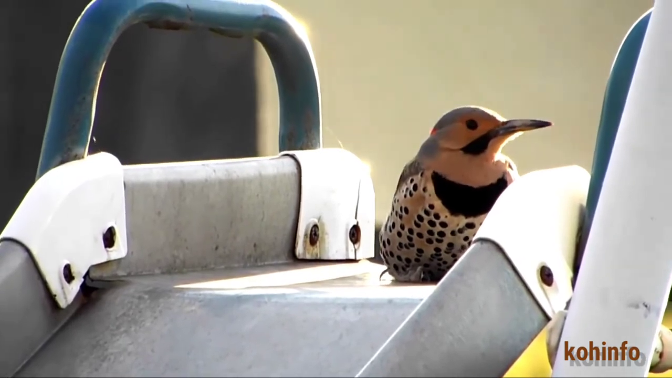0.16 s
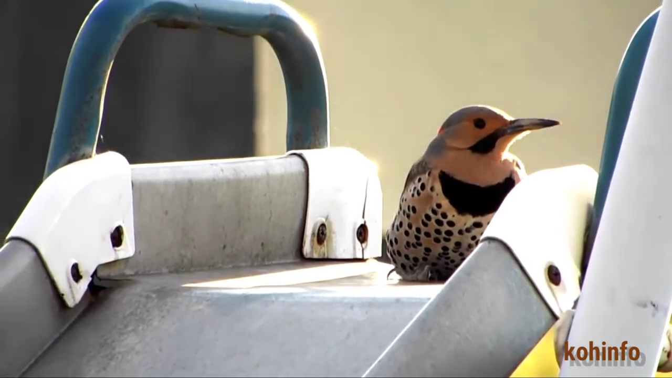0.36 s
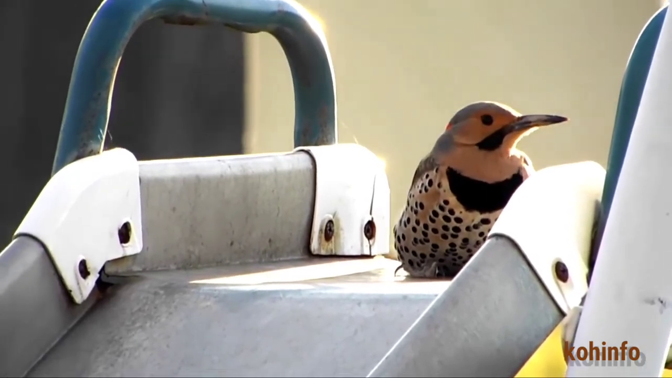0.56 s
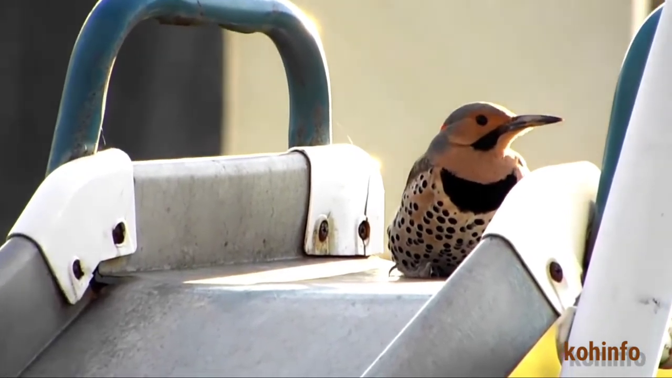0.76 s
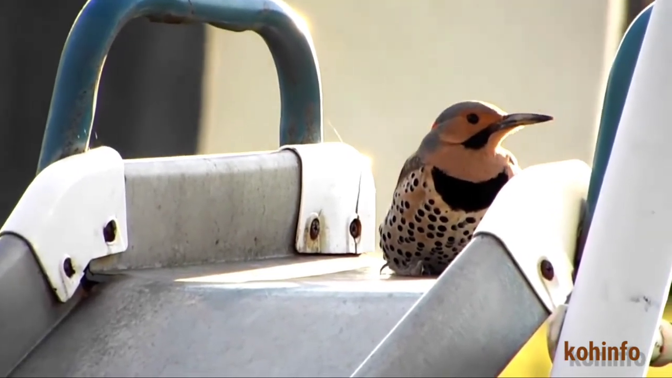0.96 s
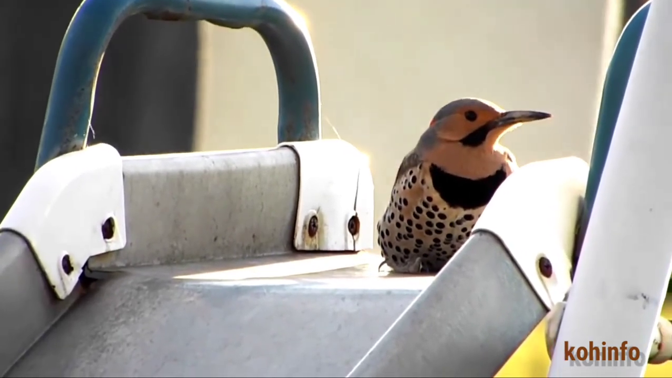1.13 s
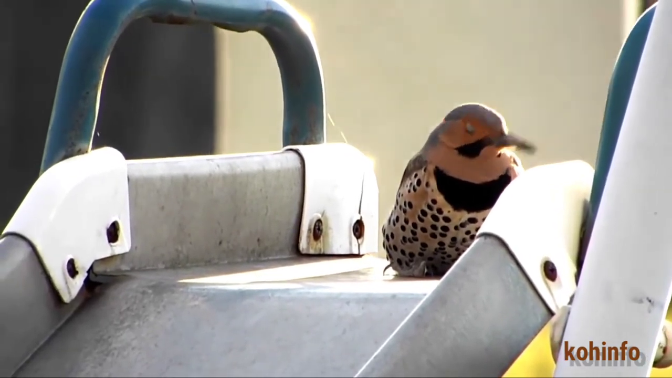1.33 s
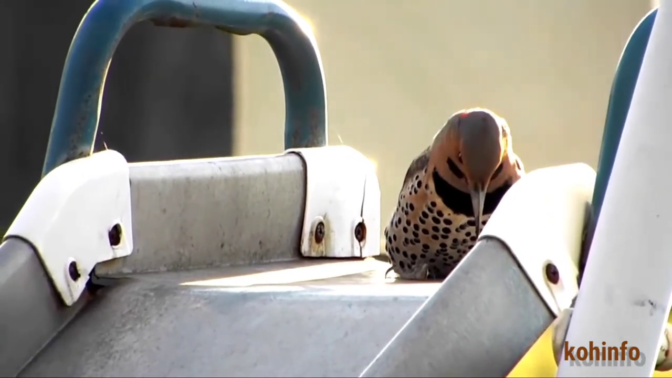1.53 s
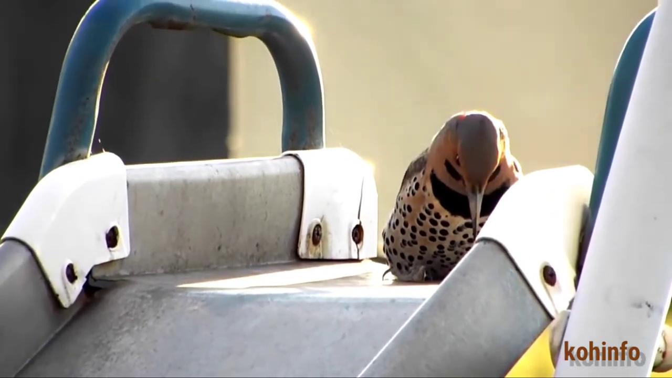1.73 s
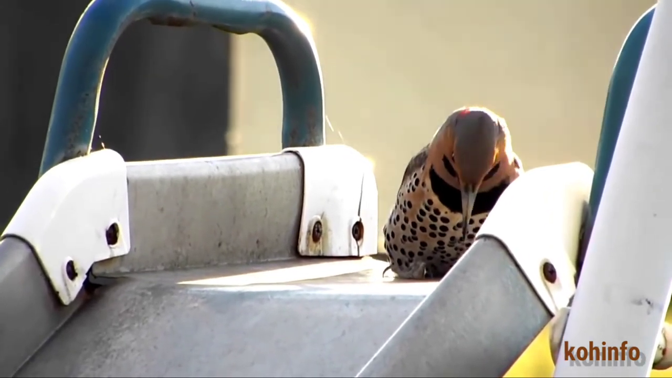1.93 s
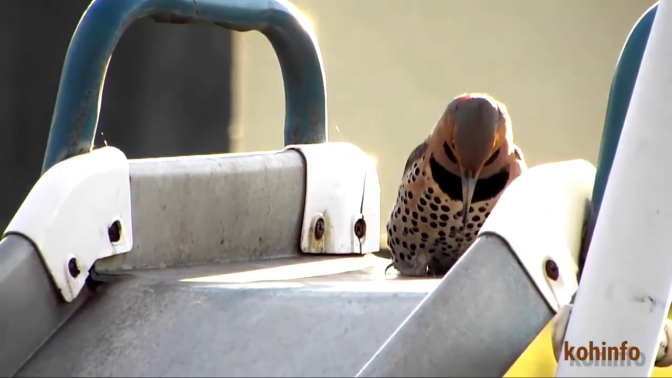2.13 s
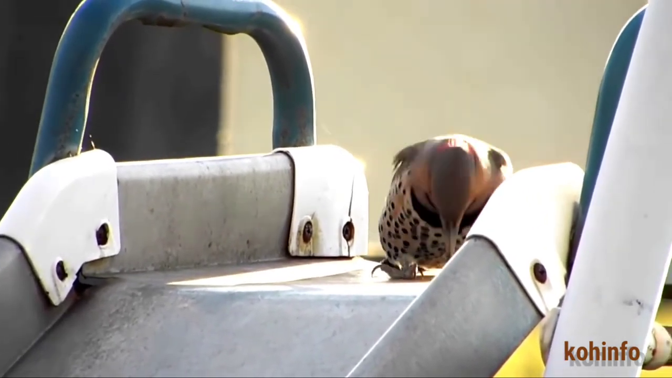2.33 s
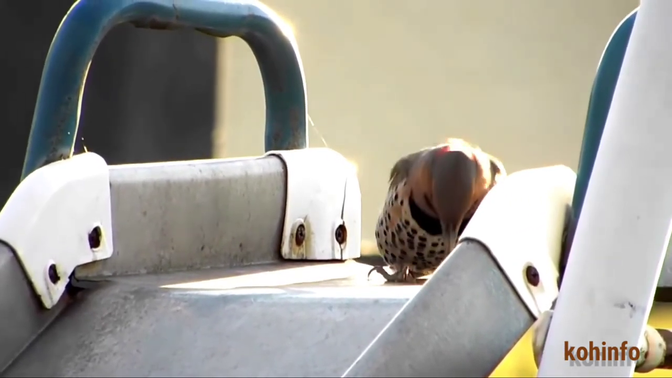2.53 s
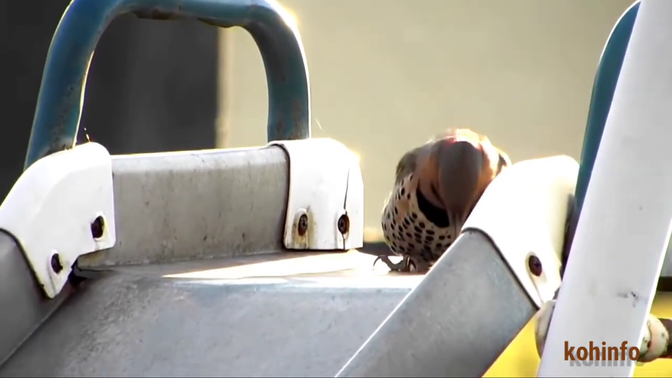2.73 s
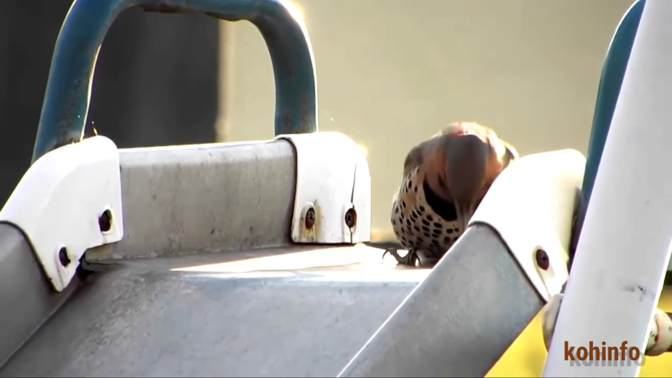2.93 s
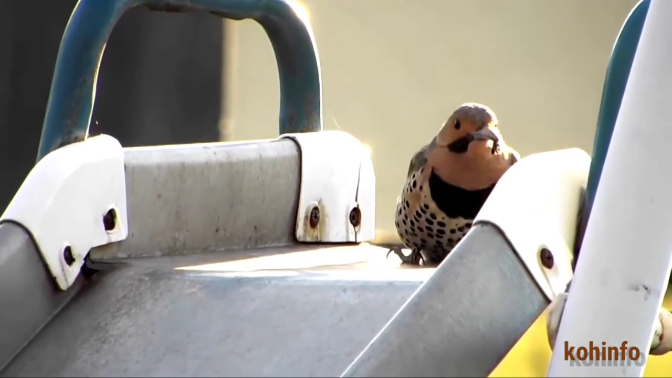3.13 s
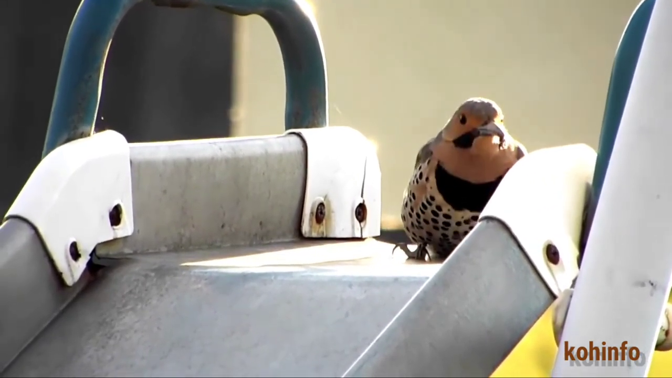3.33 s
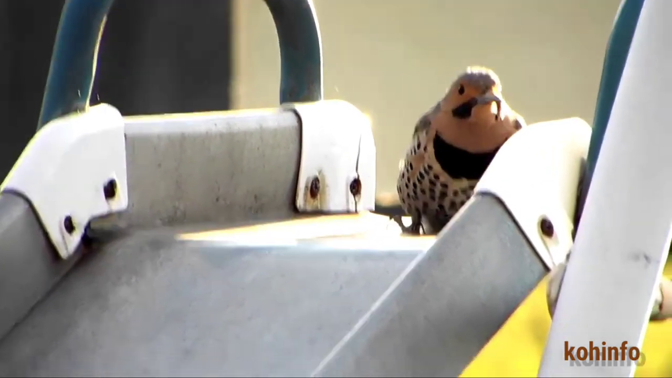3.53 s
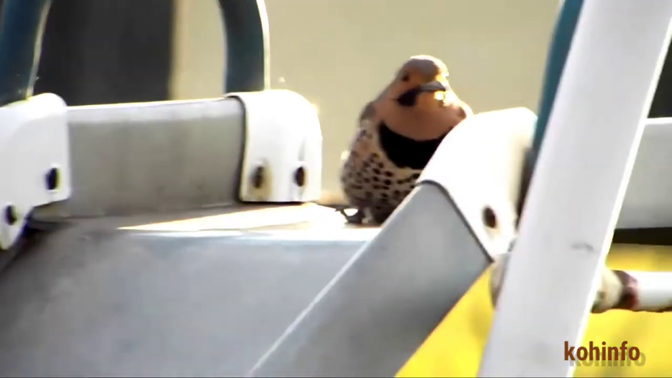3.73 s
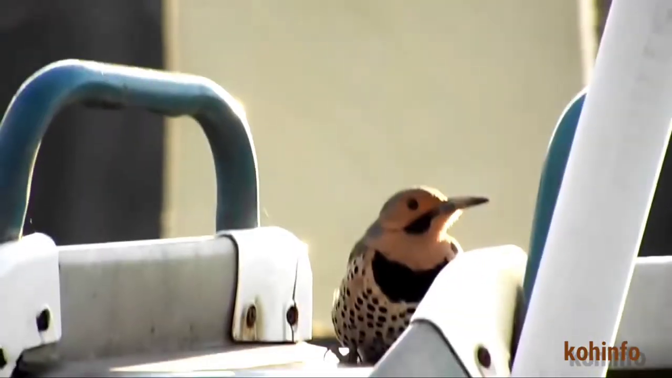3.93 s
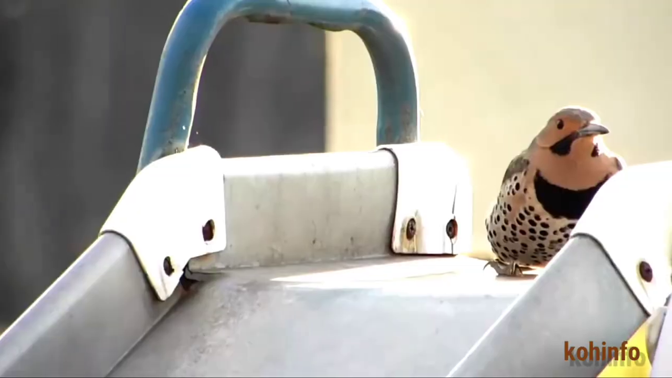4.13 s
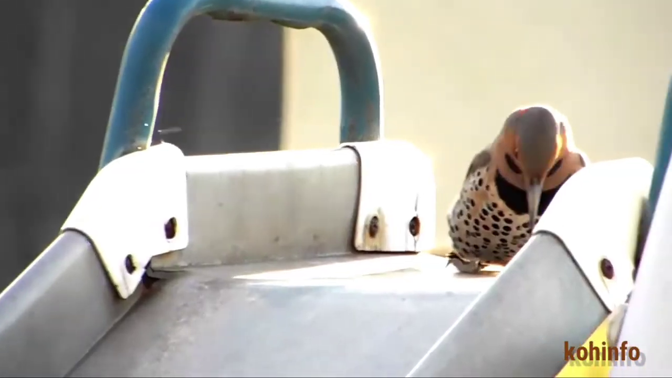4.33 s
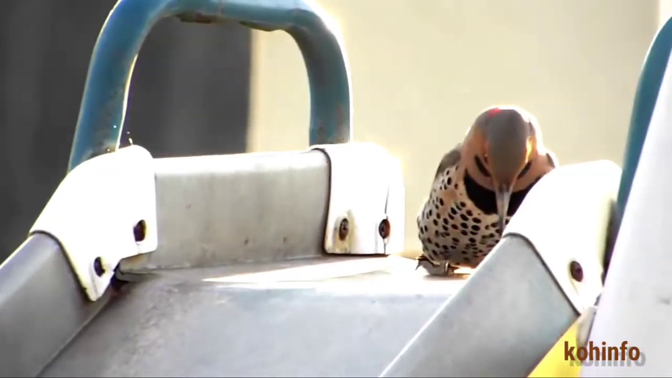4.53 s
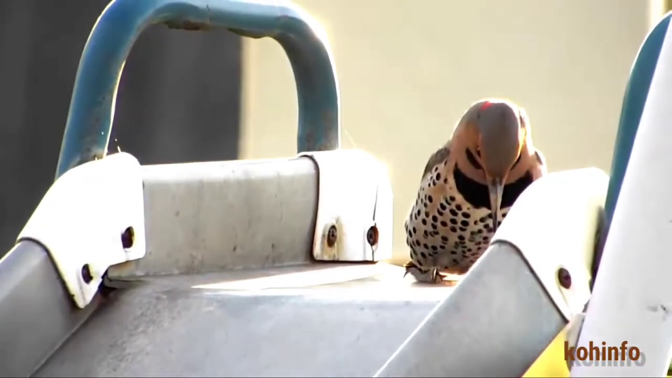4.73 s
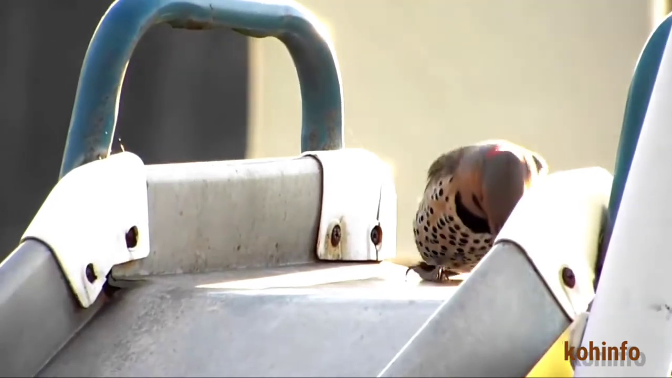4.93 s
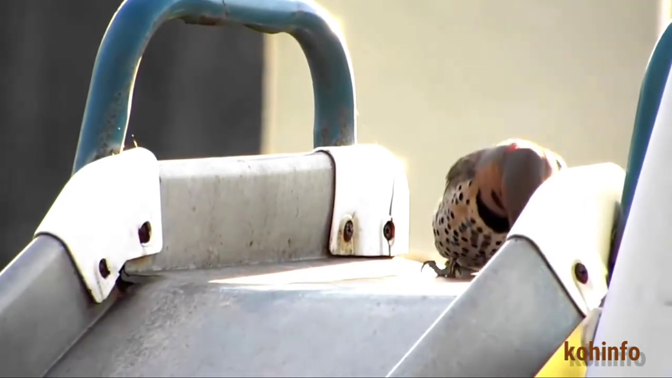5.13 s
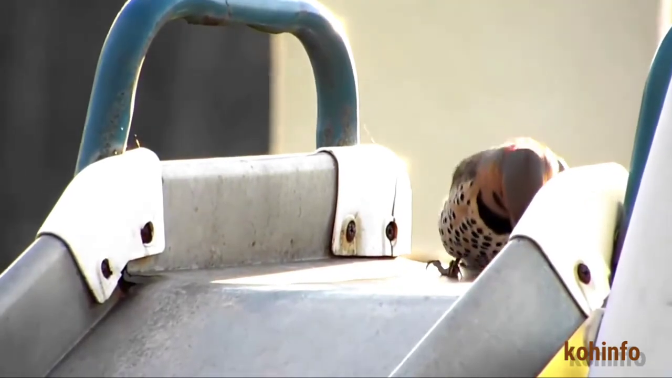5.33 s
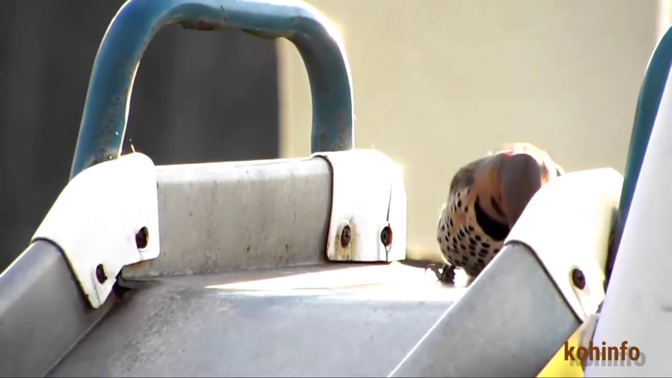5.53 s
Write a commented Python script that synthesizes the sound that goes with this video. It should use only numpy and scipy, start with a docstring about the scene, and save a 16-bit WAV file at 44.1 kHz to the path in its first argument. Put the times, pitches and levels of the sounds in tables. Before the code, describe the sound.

Outdoors, a small bird's fast trill swells over wind rumble and a distant roar. A woodpecker then drums a rapid clanging roll on a metal slide. Two sharp snaps click close to the microphone, the sound briefly dips, and a second metallic roll follows, ending with slurred bird calls.

```python
"""Wind rumbles on the microphone under a distant roar and drone, with a hollow swell near the start.
A bird trills in crescendo, soft rustles pass, and small birds whistle and buzz throughout.
A woodpecker drums a fast roll on the metal top of a playground slide: each blow excites decaying modes.
Two sharp snaps sound close by; soon the whole level dips briefly and the roar comes back softer.
The second roll follows, then a cluster of slurred calls, while the roar grows again."""
import sys
import numpy as np
from scipy import signal
from scipy.fft import rfft, irfft
from scipy.io import wavfile

SR = 44100
rng = np.random.default_rng(int(sys.argv[2]) if len(sys.argv) > 2 else 0)


def put_to_file(sound):
    """Save the sound as 16-bit audio at rate SR, in the file named by the first command-line argument."""
    columns = np.atleast_2d(sound).T  # one column per channel
    safe = np.clip(columns, -1, 1)
    whole_steps = np.round(safe * 32767)
    wavfile.write(sys.argv[1], SR, whole_steps.astype(np.int16))


N = 250033
TIME = np.arange(N) / SR


def amp(db):
    """Logarithmic level: decibels become an amplitude ratio."""
    return 10 ** (np.asarray(db) / 20)


def unit(x):
    """Normalization: the signal is scaled to a root-mean-square value of 1."""
    return x / np.sqrt(np.mean(x ** 2) + 1e-20)


def at_hz(points, hz):
    """Interpolation on a logarithmic frequency axis."""
    table_hz, value = np.transpose(points)
    return np.interp(np.log(hz + 1), np.log(table_hz + 1), value)


def level(rows):
    """Envelope: gain over the whole scene, linear in decibels between the rows."""
    return amp(np.interp(TIME, *np.transpose(rows)))


def add(mix, start_s, sound):
    """Superposition: a sound is summed into the mix in place, cut off at the end."""
    part = mix[..., max(round(start_s * SR), 0):][..., :sound.shape[-1]]
    part += sound[..., :part.shape[-1]]


def noise(spectrum, likeness, size):
    """Coherence: shared and opposed random parts set how alike left and right are at each frequency."""
    hz = np.fft.rfftfreq(size, 1 / SR)
    same = np.clip(at_hz(likeness, hz), 0, 1)
    white = rfft(rng.standard_normal((2, size)))
    mid, side = white * np.sqrt([1 + same, 1 - same])
    colored = np.array([mid + side, mid - side]) * amp(at_hz(spectrum, hz))
    return unit(irfft(colored, size))


def die_away(x, t60s):
    """Frequency-dependent damping: each band decays exponentially at its own speed."""
    hz, t, bands = signal.stft(x, SR, nperseg=256)
    decay = amp(-60 * t / at_hz(t60s, hz)[:, None])
    return signal.istft(bands * decay, SR, nperseg=256)[1][:, :x.shape[-1]]


def drift(size, rate_hz):
    """Low-pass random process: a smooth wander of rms 1."""
    hz = np.fft.rfftfreq(size, 1 / SR)
    return unit(irfft(rfft(rng.standard_normal(size)) * np.exp(-(hz / rate_hz) ** 2), size))


# strongest modes of the slide: frequency_hz, level_db, t60_s
MODES = [(302, -9, 0.41), (346.4, -1.5, 0.89), (374.8, -7, 0.85), (470.7, -9, 0.57), (736, -13, 0.66),
         (881, -4, 0.42), (1092, -1, 0.66), (1227, -14, 0.45), (1290, -2, 0.26), (1342, 6, 0.14),
         (1690, -16, .3), (1809, 3.5, 0.37), (1936, 0, 0.23), (1893, -15, 0.26), (2045, -3.5, 0.31),
         (3020, -4, 0.42), (3860, -40, .2), (4200, -11, 0.33), (5000, -6, 0.31), (5460, -5.5, 0.3)]
# dense weaker modes of the sheet: frequency_hz, density_db_per_hz
CLANG = [(60, -23), (200, -10), (380, -4), (560, -5), (900, -0.5), (1400, 2), (1950, -5.5), (2300, -1.5),
         (4000, -6), (5800, -3.5), (7200, -16), (9000, -20), (15000, -20)]
# decay of the dense modes: frequency_hz, t60_s
CLANG_T60 = [(300, 1), (1500, 0.48), (5000, 0.38), (9000, 0.34), (15000, 0.13)]
# hollow knock near the bill: frequency_hz, density_db_per_hz
KNOCK = [(400, -20), (800, -9), (1100, 5.5), (1400, -11.5), (1850, 6.5), (2200, -21), (4000, -17),
         (8000, -36)]
# left-right likeness of the metal sound: frequency_hz, likeness (0-1)
METAL_LIKENESS = [(200, 1), (1500, 0.99), (2500, 1), (4400, .91), (8000, 0.66), (15000, .35)]


def drumming(modes_db=-24.0, clang_db=-20, crack_db=-18, crack_t60=0.016, knock_db=-17, knock_t60=0.1,
             alike=0.51, mode_spread=0.0049, build_s=0.0044):
    """Modal excitation: each blow cracks and knocks, then rings strong modes and a dense metal clang."""
    t = np.arange(SR) / SR
    out = np.zeros((2, N))
    alike = np.clip(alike, 0, 1)
    sheet = noise(CLANG, METAL_LIKENESS, size=SR)
    mode_hz = np.transpose(MODES)[0][:, None]
    fades = np.array([amp(db - 60 * t / t60) for _, db, t60 in MODES])
    spreading = 1 - np.exp(-t / build_s)  # the ring needs a moment to cross the sheet
    for start_s, force_db in blows():
        # the bill lands on a slightly different spot each time: only part of the clang repeats
        fresh = noise(CLANG, METAL_LIKENESS, size=SR)
        dense = np.sqrt(alike) * sheet + np.sqrt(1 - alike) * fresh
        # each strong mode, a cluster of close ones, answers at a slightly different pitch
        detune, phase = rng.standard_normal((2, len(MODES), 1))
        blow_hz = mode_hz * (1 + mode_spread * detune)
        ring = (fades * np.sin(2 * np.pi * (blow_hz * t + phase))).sum(0)
        crack = amp(crack_db - 60 * t / crack_t60) * dense
        knock = amp(knock_db - 60 * t / knock_t60) * noise(KNOCK, METAL_LIKENESS, size=SR)
        clang = amp(clang_db) * die_away(dense, CLANG_T60)
        ringing = spreading * (clang + amp(modes_db) * ring)
        add(out, start_s, amp(force_db) * (crack + knock + ringing))
    return out


# drum rolls: start_s, force_db, lag_s (time lost while the first blows get up to speed)
ROLLS = [(2.3312, -0.95, .0052), (4.9324, 0.6, .0034)]
# force through every roll, a hard start, a slack, a swell and a fade: since_start_s, force_db
ROLL_FORCE = [(0, 2), (.045, 1), (.12, -2), (.42, 0.25), (.63, -1), (.735, -3.5)]
BLOW_COUNT, BLOW_PERIOD_S = 19, .04051


def blows(settle_blows=1.0):
    """Periodic impacts: an exponential lag lets each roll settle at once into a steady beat."""
    k = np.arange(BLOW_COUNT)
    for start_s, force_db, lag_s in ROLLS:
        since = k * BLOW_PERIOD_S + lag_s * (1 - np.exp(-k / settle_blows))
        forces_db = force_db + np.interp(since, *np.transpose(ROLL_FORCE))
        yield from zip(start_s + since, forces_db)


def whistle(hz, waver=0.0039):
    """Frequency modulation: a nearly pure bird tone on a slightly unsteady pitch."""
    unsteady_hz = hz * (1 + waver * drift(len(hz), 240))
    return np.sqrt(2) * np.sin(2 * np.pi * np.cumsum(unsteady_hz) / SR)


# one trill note, a down-slur and an upward flick: since_start_s, pitch_hz, level_db
SLUR = [(0, 6410, -26), (.004, 5953, 0), (.009, 5490, -1), (.015, 4895, -8.5), (.019, 4375, -6.5),
        (.021, 5800, -1), (.023, 7300, -11.5), (0.025, 8000, -17)]
TRILL_START_S, TRILL_PERIOD_S, TRILL_COUNT = .374, .05686, 27
# full level, extra at the soft start, and time taken to grow
TRILL_DB, TRILL_SOFT_DB, TRILL_GROW_S = -26, -11, 0.92


def trill(pitch_spread=0.017, pace_spread=0.1, rasp=0.0216, uneven_db=1.0, range_spread=0.096):
    """Repetition with variation: one slurred note at an even pace in crescendo, never quite alike."""
    mark_s, mark_hz, mark_db = np.transpose(SLUR)
    out = np.zeros(N)
    for since in np.arange(TRILL_COUNT) * TRILL_PERIOD_S:
        sharp, slow, loud, wide = rng.standard_normal(4)
        softness_db = TRILL_SOFT_DB * max(1 - since / TRILL_GROW_S, 0)
        note_db = TRILL_DB + softness_db + uneven_db * loud
        marks = mark_s * np.exp(pace_spread * slow)
        t = np.arange(0, marks[-1], 1 / SR)
        shape = amp(np.interp(t, marks, mark_db)) * signal.windows.tukey(len(t), .1)
        widened_hz = mark_hz + range_spread * wide * (mark_hz - mark_hz.mean())
        pitch_hz = np.interp(t, marks, widened_hz) * (1 + pitch_spread * sharp)
        add(out, TRILL_START_S + since, amp(note_db) * shape * whistle(pitch_hz, waver=rasp))
    return out


def song(buzz_hz=57, buzz_slide=0.085, taper=0.75, rasp=0.012, uneven_db=2, bend=1.576,
         fade_db=-3, hoarse_db=-7.5, hoarse_spread=0.135):
    """Amplitude and frequency modulation: gliding whistles fade; buzzes break into sliding, hoarse pulses."""
    out = np.zeros(N)
    for start_s, length_s, first_hz, last_hz, level_db, buzz in notes():
        t = np.arange(0, length_s, 1 / SR)
        done = np.clip(t / length_s, 0, 1)
        glide_hz = last_hz + (first_hz - last_hz) * (1 - done) ** bend
        buzz = np.clip(buzz, 0, 1)
        cycle = (buzz_hz * t) % 1
        unevenness = amp(buzz * uneven_db * drift(len(t), 40))
        pulses = (1 - buzz * np.cos(np.pi * cycle) ** 2) ** 2 * unevenness
        pulse_slide = 1 + buzz ** 2 * buzz_slide * (1 - 2 * cycle)
        tone = whistle(glide_hz * pulse_slide, waver=0.0069 + rasp * buzz)
        rough = whistle(glide_hz, waver=hoarse_spread) * drift(len(t), 700)
        hoarse = amp(hoarse_db) * buzz ** 2 * rough
        edges = signal.windows.tukey(len(t), taper * (1 - buzz))
        add(out, start_s, amp(level_db + fade_db * done ** 2) * pulses * edges * (tone + hoarse))
    return out


# a whistle that drops, a high buzz, a low whistle and a low buzz:
# since_start_s, length_s, start_hz, end_hz, level_db, buzz (0-1)
PHRASE = [(0, 0.069, 4030, 4050, -25, 0.04), (0.049, 0.027, 4050, 3160, -28.5, 0.2),
          (0.097, .12, 5470, 5316, -20.5, 0.74), (.298, 0.0445, 2880, 2670, -27, .15),
          (0.363, .16, 3696, 3557, -27.5, 1)]
# each time the phrase is sung: start_s, pitch_ratio, level_db, swell_db_per_s
PHRASES = [(1.605, 0.99, 1.5, -7.5), (4.16, 1.005, -5, 22)]
# a row of even pips, each sagging a little in pitch
PIP_START_S, PIP_PERIOD_S, PIP_COUNT = 3.584, .168, 4
PIP_S, PIP_HZ, PIP_SAG_HZ, PIP_DB, PIP_BUZZ = 0.058, 5800, 131, -29, 0.091
# thin, high contact notes: start_s, length_s, pitch_hz, level_db
THIN_NOTES = [(1.042, .075, 7320, -43), (1.382, .053, 7400, -42), (1.937, 0.067, 6980, -40.5),
              (2.722, .025, 7300, -32.5), (2.868, .13, 7120, -39), (3.261, 0.068, 7020, -39)]
THIN_BUZZ = 0.18
# slurred calls of other birds: start_s, length_s, start_hz, end_hz, level_db, buzz (0-1)
SLURRED_CALLS = [(1.457, .034, 7130, 6550, -25, 0), (1.485, 0.06, 6570, 6260, -16, 0.08),
                 (2.236, 0.027, 4970, 6140, -31.5, 0.3), (2.252, 0.085, 6600, 6530, -25, .1),
                 (2.97, .056, 3900, 3410, -23, 0.53), (3.371, .13, 4900, 4880, -39.5, .3),
                 (4.436, 0.024, 6900, 5830, -33.5, 0.6), (5.365, 0.048, 4350, 3790, -18, 0.73),
                 (5.395, .03, 4010, 5110, -13, 0.84), (5.434, .042, 4000, 3880, -21.5, .15),
                 (5.458, 0.035, 3620, 2930, -18, 0.7)]


def notes():
    """Transposition and sequence: lists every note as start, length, first and last pitch, level, buzz."""
    phrases = [(start_s + since, length_s, ratio * first_hz, ratio * last_hz,
                note_db + phrase_db + swell * since, buzz)
               for start_s, ratio, phrase_db, swell in PHRASES
               for since, length_s, first_hz, last_hz, note_db, buzz in PHRASE]
    pips = [(PIP_START_S + k * PIP_PERIOD_S, PIP_S, PIP_HZ, PIP_HZ - PIP_SAG_HZ, PIP_DB, PIP_BUZZ)
            for k in range(PIP_COUNT)]
    thin = [(start_s, length_s, pitch_hz, pitch_hz, level_db, THIN_BUZZ)
            for start_s, length_s, pitch_hz, level_db in THIN_NOTES]
    return phrases + pips + thin + SLURRED_CALLS


# decay of the scattered tail: frequency_hz, t60_s
YARD_T60 = [(1000, 0.82), (3800, 0.65), (6000, 0.58), (9000, 0.19)]


def yard(x, echoes_db, tail_db, echo_s, count=12):
    """Convolution: direct sound, early echoes from nearby walls, and a scattered tail from the trees."""
    scatter = noise([(1000, 0), (10000, 0)], [(1000, 0.94), (10000, 0.72)], size=SR)
    tail = die_away(scatter, YARD_T60)
    response = amp(tail_db) * tail / np.linalg.norm(tail[0])
    echo_gain = amp(echoes_db) / np.sqrt(count)
    for when, sign, side in rng.random((count, 3)):
        delay = int((.002 + when * echo_s) * SR)
        # up to two samples between the channels place the echo on either side
        for channel, offset in enumerate((0, round(side * 4 - 2))):
            response[channel, delay + offset] += np.sign(sign - .5) * echo_gain
    response[:, 0] += 1
    return signal.fftconvolve(x[None], response, axes=1)[:, :N]


# snaps, the first two almost together: start_s, level_db, ring_hz, t60_s, knock_db
SNAPS = [(3.668, -11.5, 5570, 0.018, -36), (3.673, 2.5, 6120, 0.021, -26), (3.809, -6.5, 5800, 0.02, -3)]
# bright spray: frequency_hz, density_db_per_hz
SNAP_SPRAY = [(1500, -7.5), (3500, -9), (5500, 4), (7900, -2.5), (9300, -13), (15000, -15)]
# left-right likeness of the spray: frequency_hz, likeness (0-1)
SNAP_LIKENESS = [(1000, 0.54), (5000, 0.26), (9000, 0.15)]


def snaps(spray_db=-4, ring_db=-2, knock_hz=1100, lead_rad=1.54, size=4096):
    """Transient decay: hard, dry snaps off to one side, each a bright spray, a short ring and a knock."""
    t = np.arange(size) / SR
    out = np.zeros((2, N))
    for start_s, level_db, ring_hz, t60, knock_db in SNAPS:
        spray = amp(spray_db) * noise(SNAP_SPRAY, SNAP_LIKENESS, size=size)
        tone = signal.hilbert(whistle(np.full(size, ring_hz), waver=0.057))
        turn = np.exp(1j * np.array([[0], [lead_rad]]))  # reaches one side first
        ring = amp(ring_db) * np.real(tone * turn)
        knock = amp(knock_db) * np.sin(2 * np.pi * knock_hz * t)
        add(out, start_s, amp(level_db - 60 * t / t60) * (spray + ring + knock))
    return out


# soft rustles: start_s, length_s, level_db
RUSTLES = [(0.901, 0.17, -28.5), (1.261, 0.12, -29), (4.404, 0.2, -34)]
# rustle color: frequency_hz, density_db_per_hz
RUSTLE = [(800, -30), (2000, -9), (4500, 10), (6500, -6), (14000, -19)]
# left-right likeness, also of the wind, far sounds and hiss: frequency_hz, likeness (0-1)
AIR_LIKENESS = [(30, 0.58), (80, 0.84), (150, 0.97), (300, 0.83), (1300, 0.99), (4000, 0.72), (8000, 0.26),
                (14000, 0.1)]


def rustles(grain_db=2, rise_s=0.018):
    """Modulated noise: grainy puffs start quickly and fade."""
    out = np.zeros((2, N))
    for start_s, length_s, level_db in RUSTLES:
        t = np.arange(0, length_s, 1 / SR)
        unevenness = amp(grain_db * drift(len(t), 200))
        grains = unit(noise(RUSTLE, AIR_LIKENESS, size=len(t)) * unevenness)
        add(out, start_s, amp(level_db) * np.minimum(t / rise_s, 1) * (1 - t / length_s) * grains)
    return out


# wind color: frequency_hz, density_db_per_hz
WIND = [(10, -1.5), (25, 4), (50, -1.5), (100, -6), (170, -21.5), (260, -35), (400, -28), (900, -47)]
# wind strength: start_s, level_db
WIND_DB = [(0, -30), (.8, -29.5), (1.5, -32), (2.3, -31), (2.5, -22.5), (2.7, -27.5), (3.7, -30.5),
           (4.1, -23.5), (4.5, -26.5), (4.9, -24), (5.67, -27)]
# low bumps on the microphone: start_s, length_s, pitch_hz, level_db
BUMPS = [(2.424, 0.031, 85, -9), (2.479, 0.027, 89, -8), (4.336, 0.05, 49.4, -14),
         (4.877, 0.045, 49.2, -10.5), (5.357, 0.033, 90, -18)]


def wind(gust_db=2.0, bump_lag_rad=1.6):
    """Turbulent pressure: lumpy low noise and short windowed bumps on the microphone."""
    gusts = amp(gust_db * drift(N, 5.9))
    out = level(WIND_DB) * unit(noise(WIND, AIR_LIKENESS, size=N) * gusts)
    for start_s, length_s, pitch_hz, level_db in BUMPS:
        t = np.arange(0, length_s, 1 / SR)
        lag = np.array([[0], [bump_lag_rad]])  # one port feels it first
        turn = 2 * np.pi * pitch_hz * (t - length_s / 2) - lag
        add(out, start_s, amp(level_db) * np.hanning(len(t)) * np.cos(turn))
    return out


# distant roar, low drone and hollow swell in the roar: frequency_hz, density_db_per_hz
ROAR = [(200, -4.5), (450, -9.5), (600, -6.5), (900, -0.5), (1500, 1.5), (2300, -8.5), (3500, -10),
        (5500, -20), (7500, -23), (12000, -68)]
DRONE = [(60, -4.5), (120, 2), (190, 3), (280, 1.5), (400, -10), (700, -36)]
SWELL = [(400, -29), (650, -7), (850, 0), (1100, -1), (1600, -11), (2600, -43)]
# their strengths: start_s, level_db
ROAR_DB = [(0, -33.5), (.6, -33.5), (.93, -29), (1.15, -31.5), (2.2, -32), (3.2, -28), (3.65, -31),
           (4.161, -29), (4.22, -42), (4.9, -41.5), (5.67, -30)]
DRONE_DB = [(0, -36), (.8, -35), (1.699, -31.5), (2.2, -32.5), (3.2, -32), (4.16, -30), (4.22, -41.5),
            (4.9, -35), (5.67, -34)]
SWELL_DB = [(0, -38), (0.349, -31), (.55, -33.5), (.8, -53), (1.2, -80)]


def far_roar(waver_db=.5):
    """Spectral shaping: three colored noises, each with its own envelope and slight wavering."""
    layers = [(ROAR, ROAR_DB), (DRONE, DRONE_DB), (SWELL, SWELL_DB)]
    return sum(level(envelope) * noise(color, AIR_LIKENESS, size=N) * amp(waver_db * drift(N, 15))
               for color, envelope in layers)


# hiss color: frequency_hz, density_db_per_hz
HISS = [(200, 0), (700, 12), (2000, -16), (5000, 5), (8000, -6.5), (15000, -5.5)]


def hiss(level_db=-41.5):
    """Stationary noise: a thin, steady colored hiss."""
    return amp(level_db) * noise(HISS, AIR_LIKENESS, size=N)


# gain of the whole mix, with a brief dip: start_s, gain_db
MIX_GAIN = [(4.165, 3.5), (4.19, -24), (4.23, -15), (4.28, -5.5), (4.32, 1.5)]


def scene():
    """Superposition: the near woodpecker, farther birds and open air share one final gain curve."""
    trilling = yard(trill(), echoes_db=-2.5, tail_db=-2.5, echo_s=0.0073)
    singing = yard(song(), echoes_db=-4.5, tail_db=-6.5, echo_s=.02)
    air = wind() + far_roar() + hiss()
    mix = drumming() + trilling + singing + snaps() + rustles() + air
    return mix * level(MIX_GAIN)


def record(dry, edge_hz=15500):
    """Clipping and band limiting: peaks flatten at full scale, then a low-pass filter removes the top."""
    clipped = np.clip(dry, -1, 1)
    low_pass = signal.firwin(511, edge_hz, window=("kaiser", 9), fs=SR)
    return signal.oaconvolve(clipped, low_pass[None], "same")


dry = scene()
out = record(dry)
put_to_file(out)
```